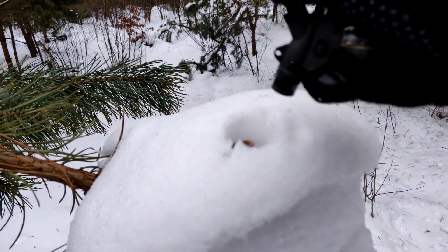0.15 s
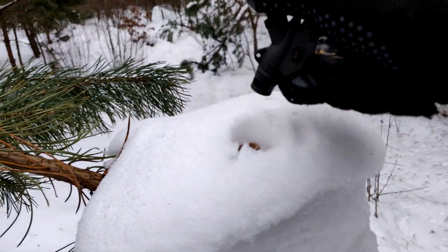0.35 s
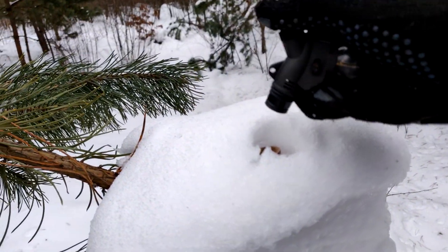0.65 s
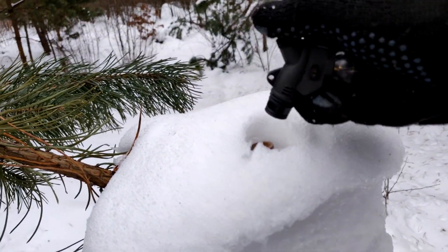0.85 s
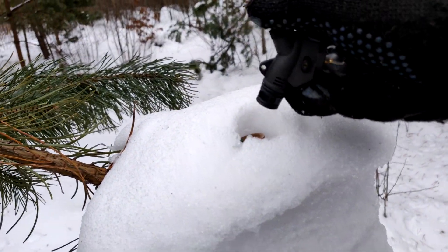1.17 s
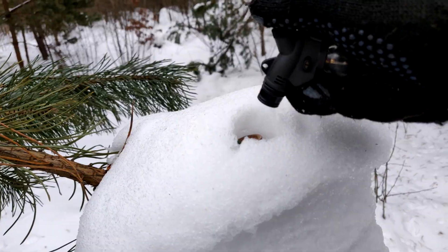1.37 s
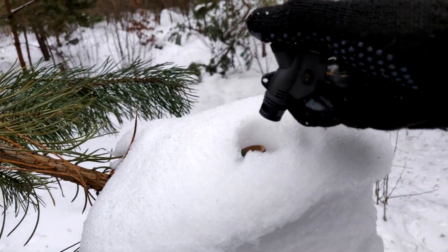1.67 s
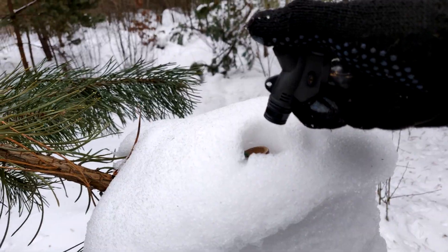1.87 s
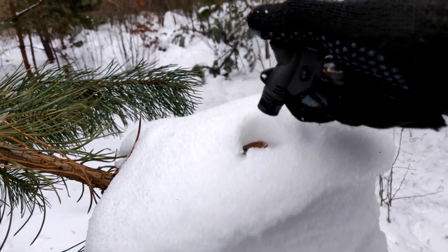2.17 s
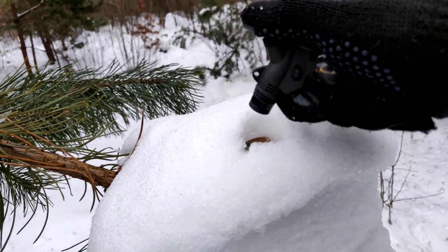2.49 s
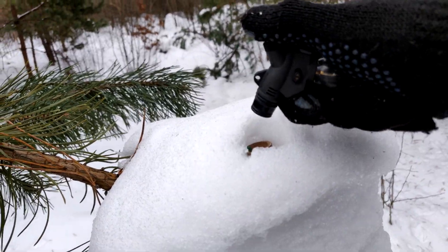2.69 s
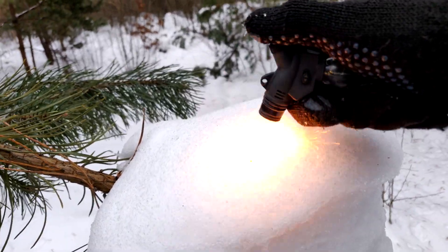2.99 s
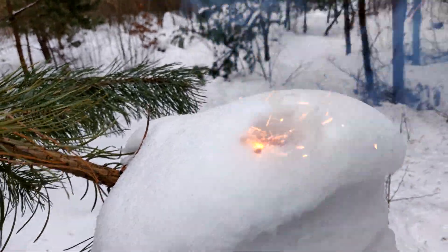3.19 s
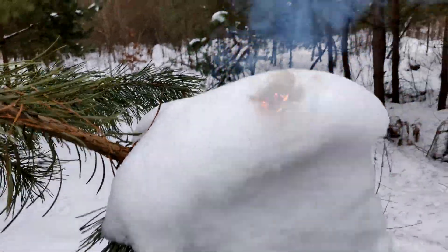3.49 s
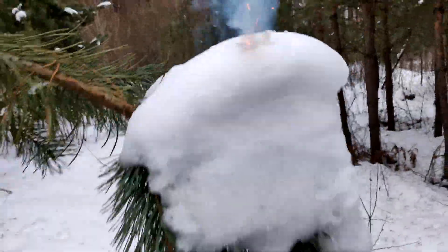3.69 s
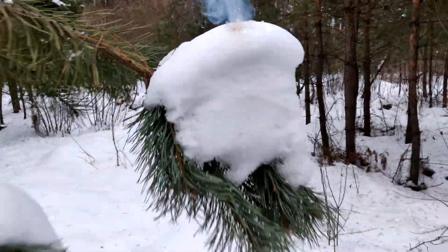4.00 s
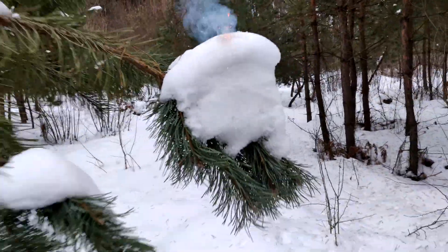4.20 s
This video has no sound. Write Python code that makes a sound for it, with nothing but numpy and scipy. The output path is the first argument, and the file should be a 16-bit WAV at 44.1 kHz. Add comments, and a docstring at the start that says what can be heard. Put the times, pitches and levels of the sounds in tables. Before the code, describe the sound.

Close stereo phone sound among snowy pines: low, rushing wind throughout, a tiny knock of a lighter trigger, then one hard, bright click with a short rattle. After over two seconds of mostly wind and a faint high flame hiss, a fuse ignites abruptly, rushing and sputtering with small crackles. Its roar fades quickly, its hiss gets duller, and soft thuds of steps in snow appear near the end.

```python
"""On a snowy branch with forest behind, a firecracker fuse is lit by a jet lighter, close to a phone's two microphones.
Wind is filtered noise from all around; lighter gas and flame are thin hisses of noise beside the phone.
The igniter's snap is a few impulses ringing the plastic body, with noise for its loose parts.
The fuse catches, flares, then fizzes and spits: fine-grained noise over a low roar, with a hollow wash around it.
It grows fainter and duller as the phone is carried back, with soft steps in the snow."""
import sys
import numpy as np
from scipy import signal
from scipy.fft import rfft, irfft
from scipy.io import wavfile
from scipy.ndimage import uniform_filter1d, map_coordinates

SR = 44100
rng = np.random.default_rng(int(sys.argv[2]) if len(sys.argv) > 2 else 0)


def wav_record(signal):
    """Record a signal, one row per channel, as 16-bit PCM in the file named by sys.argv[1]."""
    frames = np.transpose(np.atleast_2d(signal))
    bounded = np.clip(frames, -1, 1)
    # unit amplitude maps onto the largest positive 16-bit level
    quanta = np.round(bounded * 32767).astype(np.int16)
    wavfile.write(sys.argv[1], SR, quanta)


N = 191760
T = np.arange(N) / SR
HZ = np.fft.rfftfreq(N, 1 / SR)

# Spectrum of the wind in the trees. Each row: frequency in Hz, relative level in dB per Hz.
WIND_COLOUR = [(12, -22), (22, -3), (38, -5), (60, -17.5), (110, -11), (150, -7), (250, -5.5), (450, -2),
               (850, -1.5), (1100, -5.5), (1500, -15), (2200, -25.5), (3200, -37.5), (5000, -47)]
# Spectrum of the lighter's flame. Each row: frequency in Hz, relative level in dB per Hz.
FLAME_COLOUR = [(1500, 2), (3000, -13), (5000, -7), (8000, -7), (10000, -56), (12500, -7), (14000, 8),
                (16000, 2.5)]
# Level of the flame's hiss over time. Each row: time in seconds, level in dB.
FLAME_LEVEL = [(.56, -62), (.8, -64), (1.02, -58.5), (1.4, -59), (1.7, -65.5), (2.0, -62.5), (2.27, -59),
               (2.52, -60), (2.74, -60.5), (2.86, -64), (3.0, -55.5)]
# Small ticks of the lighter's trigger. Each row: time in seconds, gain in dB, pitch in Hz.
TRIGGER_TICKS = [(0.047, -20.5, 2450), (0.151, -50, 5840)]
# The igniter's spring tripping, the hammer's blow and its rebound. Each row: time in seconds, gain in dB.
SNAP_IMPULSES = [(.5175, -24.5), (.5185, -1), (.5212, -28)]
# Modes of the lighter's body. Each row: pitch in Hz, gain in dB, t60 in seconds, left minus right in dB.
BODY_MODES = [(504, -27, 0.0179, 4), (1750, -31, 0.014, 2), (2570, -25, 0.013, -13),
              (2800, -27.5, 0.03, -8), (3320, -8, 0.0079, -5), (4300, -15.5, 0.0065, -2),
              (4850, -33, 0.0098, 5), (5420, -22, 0.016, 7), (6300, -6, 0.0034, 4.5), (7640, -12, 0.004, 0),
              (8050, -24, 0.0162, 3), (10200, -11, 0.0025, -1), (13900, -25, 0.0014, -5.9)]
# Fine ring of the hammer's spring. Each row: pitch in Hz, gain in dB, t60 in seconds.
SPRING_MODES = [(2870, -44, .07), (3192, -55, .11), (3860, -58, .12), (4100, -57, .12), (6751, -50, .07),
                (8296, -53, 0.062)]
# Spectrum of the burning powder. Each row: frequency in Hz, relative level in dB per Hz.
HISS_COLOUR = [(700, -1), (1050, 1), (1500, 3), (2300, 3), (3300, -0.5), (4400, -2), (5500, -3), (6700, -3),
               (8000, -4.5), (9500, -9), (12000, -7.5), (14000, -6), (16000, -6.5)]
# Spectrum of the fuse's gas jet. Each row: frequency in Hz, relative level in dB per Hz.
ROAR_COLOUR = [(40, -46), (90, -13), (160, -7.5), (400, -3), (700, -4), (1000, -8), (1400, -9.5),
               (2500, -14.5), (5000, -44)]
# Spectrum of the hollow wash of the burning. Each row: frequency in Hz, relative level in dB per Hz.
WASH_COLOUR = [(300, -13), (650, -8), (1000, 0), (1300, -8), (2000, -18), (4000, -29)]
# Surges of the fuse on richer powder. Each row: time in seconds, gain in dB, half length in seconds.
SURGES = [(3.128, 3.5, 0.007), (3.17, 0, 0.0097), (3.44, 1.5, .014)]
# Sparks that spit out of the fuse. Each row: time in seconds, impulse gain in dB.
SPITS = [(3.127, -28), (3.173, -29), (3.278, -21), (3.3354, -19), (4.005, -31)]
# Puffs of gas from the fuse. Each row: time in seconds, level in dB, pitch in Hz, half length in seconds.
PUFFS = [(3.036, -41, 104, 0.0041), (3.093, -33, 204, 0.0093), (3.425, -38.5, 745, 0.029),
         (3.575, -44, 544, .02), (3.9, -40.5, 540, 0.05)]
# Thuds of steps in the snow. Each row: time in seconds, level in dB, pitch in Hz, half length in seconds.
STEP_THUDS = [(3.713, -33, 270, 0.012), (3.825, -39, 111, 0.0056), (4.195, -34.5, 132, 0.0081),
              (4.229, -38.5, 190, 0.006), (4.266, -41, 150, 0.0041), (4.31, -41, 193, 0.006),
              (4.334, -36.5, 284, 0.013)]
# Steps packing the snow. Each row: time in seconds, level in dB, half length in seconds.
CRUNCHES = [(4.281, -43, 0.021), (4.34, -44, 0.012)]
# Resonances of the microphone ports, a list for the left, then the right.
# Each row: centre in Hz, width in Hz, gain at the centre in dB.
PORTS = [
    [(6440, 770, 10), (15400, 1000, 7)],
    [(6280, 340, -6.5), (7910, 890, 10), (15500, 980, -0.5)],
]

PORT_SPACING_M, SOUND_M_PER_S = 0.19, 343
TOP_HZ, MIC_NOISE_DB = 15800, -64
# wind: level at the start and its slow rise
WIND_DB, WIND_RISE_DB_PER_S = -40, 0.5359
# lighter: the valve opens, the gas catches, the trigger is let go
VALVE_S, LIGHT_S, RELEASE_S = .32, 0.54, 3.15
GAS_DB, GAS_OPEN_S, GAS_FADE_S = -71, .08, 0.13
SCRAPE_DB = -41  # the glove on the trigger
# loose parts after each impulse: gain and decay of the first chatter and of its settling
CHATTER_DB, CHATTER_S, SETTLE_DB, SETTLE_S = -16, 0.0029, -48, 0.012
CHATTER_ROUGH_DB, CHATTER_PER_S = 3, 700
CRACK_DB, CRACK_S = -17.5, 0.00093  # the bright edge of the snap
# echo of the snap from the branches
ECHO_DB, ECHO_AFTER_S, ECHO_SPREAD_S = -55, .034, .02
# recoil of the snap: half lengths of push and pull, and the gap between them
RECOIL_S, RECOIL_DB, PUSH_S, PULL_S, PULL_AFTER_S = .5205, -19, 0.0004, 0.00095, 0.001
REST_DB, REST_AFTER_S = -19, .0064  # coming to rest in the glove, relative to the recoil
# the fuse catches, and flares until its bare tip is burnt
CATCH_S, FLARE_END_S, FLARE_FADE_S = 3.004, 3.14, 0.069
# hiss of the powder and roar of its gas: steady level, extra level in the flare, build-up time
HISS_DB, HISS_FLARE_DB, HISS_ATTACK_S = -38.5, 4.5, 0.017
ROAR_DB, ROAR_FLARE_DB, ROAR_ATTACK_S = -35.5, 5.5, 0.042
# the wash comes back from all around and hardly fades
WASH_DB, WASH_ATTACK_S, WASH_FADE_DB_PER_S = -42, 0.058, 2
# depth and rate: sputter of the whole burn, flutter of the gas jet, flicker within the hiss
SPUTTER_DB, SPUTTER_PER_S = .55, 130
FLUTTER_DB, FLUTTER_PER_S = 0.9, 170
PATCHY_DB, PATCHY_PER_S = 0.7, 60
# the phone draws back, and each part of the sound fades at its own rate
RETREAT_S, HISS_FADE_DB_PER_S, ROAR_FADE_DB_PER_S = 3.47, 8, 26
# the phone turns, so the treble swings from left to right (left minus right dB at the very top)
TURN_S, TURN_LENGTH_S, FROM_DB, TO_DB = 3.35, 0.31, 12.5, -3.5
# treble of the hiss: its lift, duller in the flare and with distance
TREBLE_DB, FLARE_DULL_DB, TREBLE_FADE_DB_PER_S = 1.65, 3, 5.5
# the very top, on top of the treble: brighter in the flare, fading faster with distance
TOP_FLARE_DB, TOP_FADE_DB_PER_S = 3, 2.5
# near the end all the treble dulls
DULL_S, DULL_LENGTH_S, DULL_DB = 4.06, 0.31, 5
# echo of the hiss off the snow cap: gain, lag, change of lag as the phone draws back
BOUNCE_DB, BOUNCE_MS, BOUNCE_MS_PER_S = -15.5, 0.298, -0.11
CRUNCH_HZ, CRUNCH_WIDTH_HZ = 1500, 2800


def undb(db):
    """Decibels to gain."""
    return 10 ** (np.asarray(db) / 20)


def unit(x):
    """Scale to rms 1."""
    return x / np.sqrt(np.mean(x ** 2))


def pan(db):
    """Left and right gains for a level difference, left minus right."""
    return undb(np.array([[.5], [-.5]]) * db)


def ramp(start, length):
    """Rise evenly from 0 to 1."""
    return np.clip((T - start) / length, 0, 1)


def swell(s, half_length):
    """A smooth bump of height 1."""
    return np.exp(-.5 * ((T - s) / half_length) ** 2)


def walk(rate):
    """Random levels held 1 / rate s and smoothed twice, at rms 1."""
    k = int(SR / rate)
    held = np.repeat(rng.standard_normal(N // k + 1), k)
    return unit(uniform_filter1d(uniform_filter1d(held, k), k)[:N])


def pulses(rows):
    """One impulse for each (s, dB) row."""
    out = np.zeros(N)
    for s, db in rows:
        out[int(s * SR)] += undb(db)
    return out


def grains(spread_db):
    """Noise in tiny steps of 16 samples, a few somewhat stronger than the rest."""
    size = undb(spread_db * rng.exponential(size=N // 16 + 1))
    return unit(rng.standard_normal(N) * np.repeat(size, 16)[:N])


def colour(x, points):
    """Shape a sound's spectrum by (Hz, dB) points, at rms 1."""
    hz, db = np.transpose(points)
    shape_db = np.interp(np.log(HZ + 1), np.log(hz), db)
    return unit(irfft(rfft(x) * undb(shape_db), N))


def resonate(x, hz, width):
    """Two-pole resonance, gain 1 at the centre."""
    b, a = signal.iirpeak(min(hz, .45 * SR), hz / width, fs=SR)
    return signal.lfilter(b, a, x)


def resonate_twice(x, hz, width):
    """Two equal resonances in a row, for steeper skirts."""
    return resonate(resonate(x, hz, width), hz, width)


def near(x, lag_ms, scatter):
    """A close source reaches the right port later (earlier if negative); snow and glove scatter part of it."""
    right = irfft(rfft(x) * np.exp(-2j * np.pi * HZ * lag_ms / 10 ** 3), N)
    return unit(np.array([x, right]) + scatter * rng.standard_normal((2, N)))


def diffuse(points):
    """Sound from all around: the two ports agree only on waves long beside their spacing."""
    alike = .88 * np.sinc(2 * HZ * PORT_SPACING_M / SOUND_M_PER_S)
    mid, side = irfft(rfft(rng.standard_normal((2, N))) * np.sqrt([1 + alike, 1 - alike]), N)
    return colour(np.array([mid + side, mid - side]), points)


def thuds(rows):
    """Dull, short bursts of low noise, one for each (s, dB, Hz, half length s) row."""
    out = 0
    for s, db, hz, length in rows:
        thud = unit(resonate_twice(rng.standard_normal(N), hz, 1.3 * hz))
        out = out + undb(db) * thud * swell(s, length)
    return out


def wind():
    """Needles rush all around, slowly growing."""
    level_db = WIND_DB + WIND_RISE_DB_PER_S * T + 0.22 * walk(3.94)
    return diffuse(WIND_COLOUR) * undb(level_db) * pan(0.98)


def steps():
    """Snow gives way underfoot with dull, short thuds and a soft crunch."""
    crystals = near(grains(spread_db=1.0), lag_ms=0.0067, scatter=0.4)
    crunch = unit(resonate_twice(crystals, CRUNCH_HZ, CRUNCH_WIDTH_HZ))
    crunch_gain = sum(undb(db) * swell(s, length) for s, db, length in CRUNCHES)
    return thuds(STEP_THUDS) + crunch * crunch_gain


def trigger():
    """The plastic trigger knocks under the glove, with a faint scrape."""
    out = 0
    for s, db, hz in TRIGGER_TICKS:
        scrape = rng.standard_normal((2, N)) * np.exp(-abs(T - s) / 0.001)
        knock = resonate_twice(scrape, hz, 0.2 * hz)
        out = out + undb(db) * knock + undb(SCRAPE_DB) * resonate(scrape, 4200, 2200)
    return out


def lighter_jet():
    """Gas whistles softly in the nozzle; once lit it turns into a thin, high hiss."""
    gas = unit(resonate(near(rng.standard_normal(N), lag_ms=.02, scatter=0.58), 6500, 1500))
    flame = colour(near(rng.standard_normal(N), lag_ms=0.017, scatter=0.69), FLAME_COLOUR)
    lit = ramp(LIGHT_S, GAS_FADE_S)
    unlit = ramp(VALVE_S, GAS_OPEN_S) * (1 - lit)
    burning = lit * (1 - ramp(RELEASE_S, GAS_FADE_S))
    flame_db = np.interp(T, *np.transpose(FLAME_LEVEL)) + .5 * walk(9.0)
    return gas * unlit * undb(GAS_DB) * pan(3.1) + flame * burning * undb(flame_db) * pan(1.5)


def recoil():
    """The lighter jerks in the hand: a push of air, a slower pull and a soft settling, heard as a dry knock."""
    push = swell(RECOIL_S, PUSH_S)
    # the pull is weaker but longer, so it moves as much air as the push
    pull = swell(RECOIL_S + PULL_AFTER_S, PULL_S) * PUSH_S / PULL_S
    rest = undb(REST_DB) * swell(RECOIL_S + REST_AFTER_S, PULL_S)
    return undb(RECOIL_DB) * (push - pull + rest) * pan(2.5)


def body_ring(t):
    """The struck plastic body and the hammer's spring ring as decaying sines."""
    ring = 0
    for k, (hz, db, t60, side_db) in enumerate(BODY_MODES):
        # each mode builds up within a cycle; neighbours swing in opposite directions
        swing = (-1) ** (k + 1) * np.sin(2 * np.pi * hz * t) * (1 - np.exp(-hz * t / 0.28))
        ring = ring + undb(db) * pan(side_db) * swing * np.exp(-np.log(1000) * t / t60)
    for hz, db, t60 in SPRING_MODES:
        ring = ring + undb(db) * np.sin(2 * np.pi * hz * t) * np.exp(-np.log(1000) * t / t60)
    return ring


def igniter():
    """Spring and hammer strike: body and spring ring, loose parts chatter, branches echo faintly."""
    t = T[:SR // 5]
    chatter = undb(CHATTER_DB) * np.exp(-t / CHATTER_S) + undb(SETTLE_DB) * np.exp(-t / SETTLE_S)
    echo = undb(ECHO_DB) * np.exp(-abs(t - ECHO_AFTER_S) / ECHO_SPREAD_S)
    roughness = undb(CHATTER_ROUGH_DB * walk(CHATTER_PER_S)[:len(t)])
    contacts = rng.standard_normal((2, len(t))) * roughness
    parts_band = signal.butter(2, [3000, 9800], "bandpass", fs=SR, output="sos")
    loose_parts = signal.sosfilt(parts_band, contacts)
    crack_band = signal.butter(4, 11000, "highpass", fs=SR, output="sos")
    crack = undb(CRACK_DB) * np.exp(-t / CRACK_S) * signal.sosfilt(crack_band, contacts)
    strike = body_ring(t) + (chatter + echo) * loose_parts + crack
    return signal.fftconvolve(pulses(SNAP_IMPULSES)[None], strike, axes=1)[:, :N]


def patchy(x):
    """Turbulence makes each part of the hiss flicker on its own."""
    for hz in (1200, 2200, 3600, 5500):
        x = x + (undb(PATCHY_DB * walk(PATCHY_PER_S)) - 1) * resonate(x, hz, hz / 2)
    return x


def bounce(x, away_s):
    """The snow cap mirrors the hiss; the echo's lag shifts as the phone moves, so the colour sweeps."""
    lag_ms = BOUNCE_MS + BOUNCE_MS_PER_S * away_s + 0.032 * walk(3.99)
    read_at = (T - lag_ms / 10 ** 3) * SR
    echo = [map_coordinates(side, [read_at], order=3, mode="mirror") for side in x]
    return x + undb(BOUNCE_DB) * np.array(echo)


def fuse_hiss(flare, away_s):
    """Powder burns as fine-grained noise; the phone shades the far port most at the shortest waves."""
    powder = colour(near(grains(spread_db=0.5), lag_ms=0.035, scatter=0.46), HISS_COLOUR)
    fizz = bounce(patchy(powder), away_s)
    spectrum = rfft(fizz)
    low = irfft(spectrum / (1 + (HZ / 4000) ** 6), N)
    below_top = irfft(spectrum / (1 + (HZ / 12500) ** 16), N)
    turned = (1 + np.tanh((T - TURN_S) / TURN_LENGTH_S)) / 2
    side_db = FROM_DB + (TO_DB - FROM_DB) * turned
    top_gain = undb(TOP_FLARE_DB * flare - TOP_FADE_DB_PER_S * away_s)
    treble = (below_top - low) * pan(side_db / 2) + (fizz - below_top) * pan(side_db) * top_gain
    treble_db = TREBLE_DB - FLARE_DULL_DB * flare - TREBLE_FADE_DB_PER_S * away_s
    treble_db = treble_db - DULL_DB * ramp(DULL_S, DULL_LENGTH_S)
    # long waves bend round the phone, so the low part keeps its place
    return low * pan(1.0) + treble * undb(treble_db)


def fuse_roar():
    """The fuse's gas jet roars low and flutters on its own."""
    jet = colour(near(rng.standard_normal(N), lag_ms=-0.029, scatter=0.15), ROAR_COLOUR)
    return jet * pan(1.5) * undb(FLUTTER_DB * walk(FLUTTER_PER_S))


def fuse():
    """Powder hiss over a gas roar: a flare, an even burn, a fade as the phone draws back."""
    flare = 1 - ramp(FLARE_END_S, FLARE_FADE_S)
    away_s = np.maximum(T - RETREAT_S, 0)
    hiss_db = HISS_DB + HISS_FLARE_DB * flare - HISS_FADE_DB_PER_S * away_s
    roar_db = ROAR_DB + ROAR_FLARE_DB * flare - ROAR_FADE_DB_PER_S * away_s
    wash_db = WASH_DB - WASH_FADE_DB_PER_S * away_s
    hiss = fuse_hiss(flare, away_s) * ramp(CATCH_S, HISS_ATTACK_S) * undb(hiss_db)
    roar = fuse_roar() * ramp(CATCH_S, ROAR_ATTACK_S) * undb(roar_db)
    wash = diffuse(WASH_COLOUR) * ramp(CATCH_S, WASH_ATTACK_S) * undb(wash_db)
    surge_db = sum(db * swell(s, length) for s, db, length in SURGES)
    sputter = undb(SPUTTER_DB * walk(SPUTTER_PER_S) + surge_db)
    spits = resonate(pulses(SPITS), 5000, 7000) * pan(3.5)
    return sputter * (hiss + roar) + wash + spits + thuds(PUFFS)


def scene():
    """Everything that reaches the two ports."""
    return wind() + steps() + trigger() + lighter_jet() + recoil() + igniter() + fuse()


def port(x, resonances):
    """The narrow duct in front of a microphone lifts or hollows parts of the treble."""
    for hz, width, db in resonances:
        x = x + (undb(db) - 1) * resonate(x, hz, width)
    return x


def record(dry):
    """Each port rings at its own pitch, the electronics hiss, peaks clip at full scale, and the top is cut."""
    x = np.array([port(side, resonances) for side, resonances in zip(dry, PORTS)])
    x = np.clip(x + undb(MIC_NOISE_DB) * rng.standard_normal((2, N)), -1, 1)
    top_cut = signal.ellip(10, .2, 70, TOP_HZ, fs=SR, output="sos")
    return signal.sosfilt(top_cut, x)


dry = scene()
out = record(dry)
wav_record(out)
```